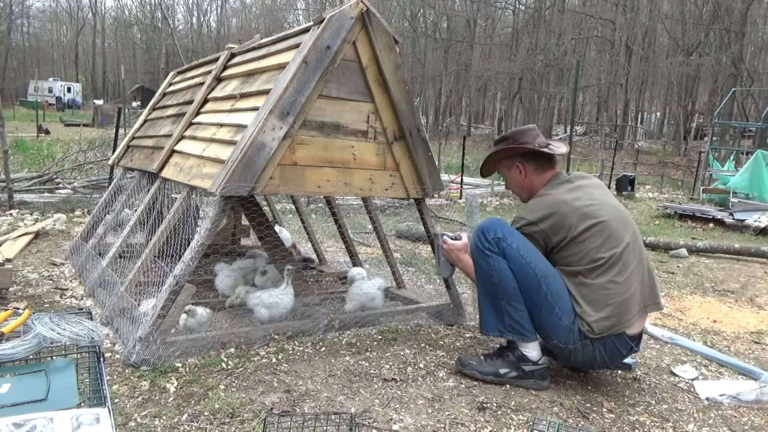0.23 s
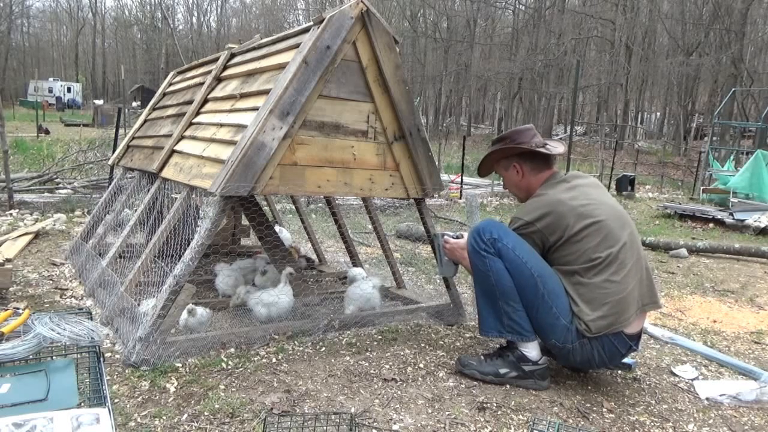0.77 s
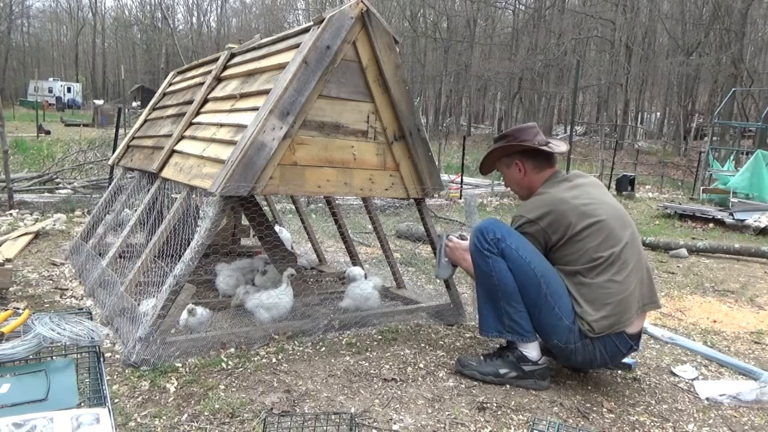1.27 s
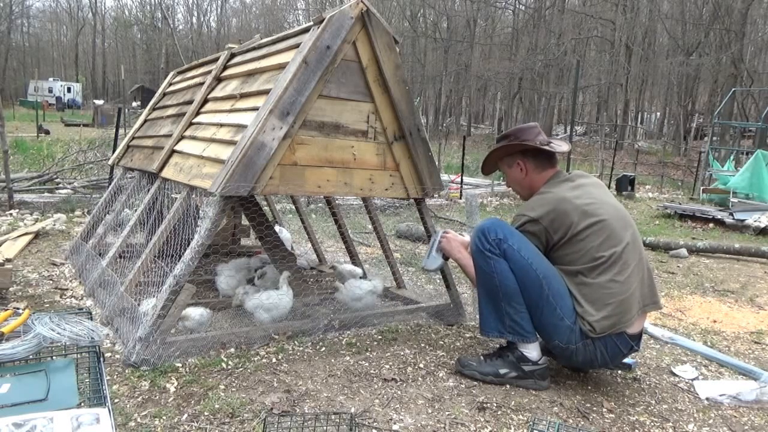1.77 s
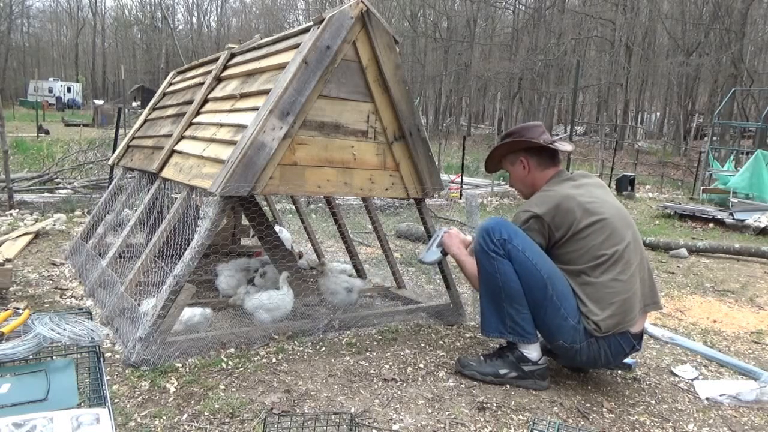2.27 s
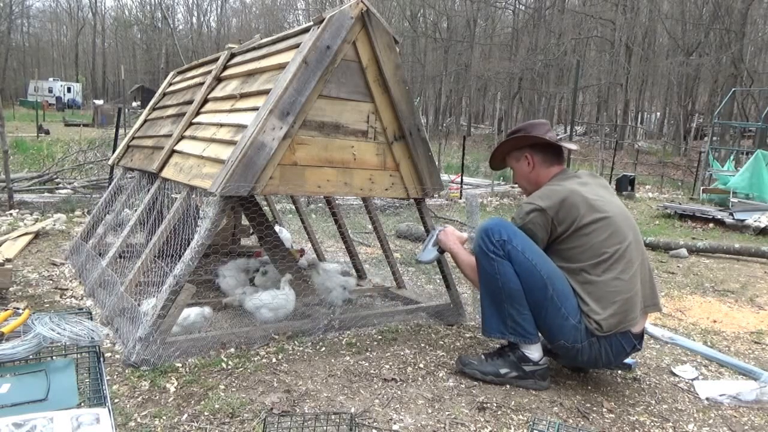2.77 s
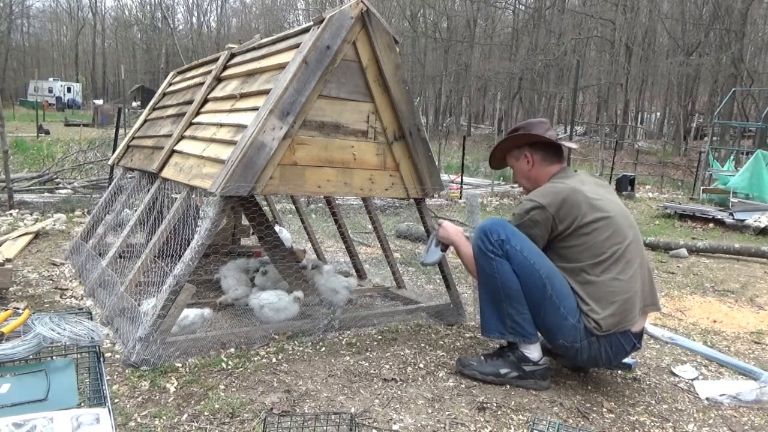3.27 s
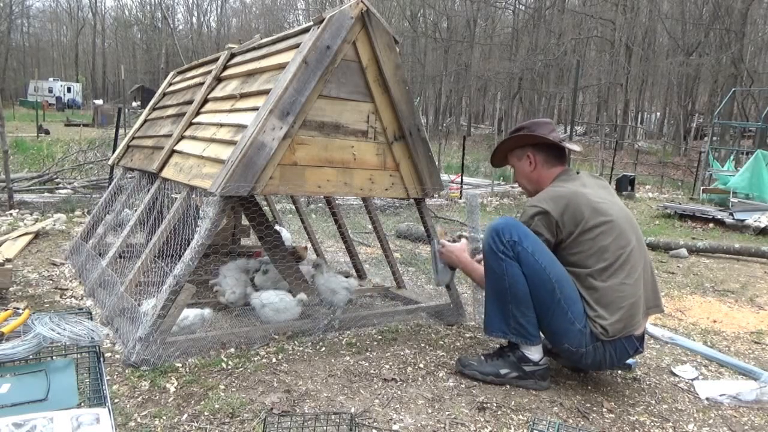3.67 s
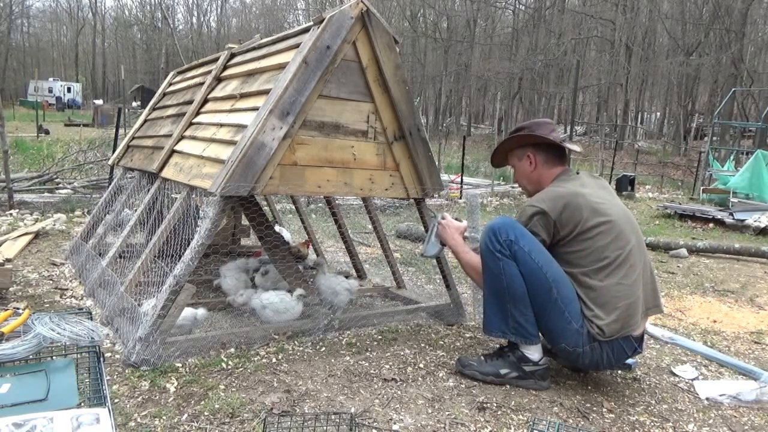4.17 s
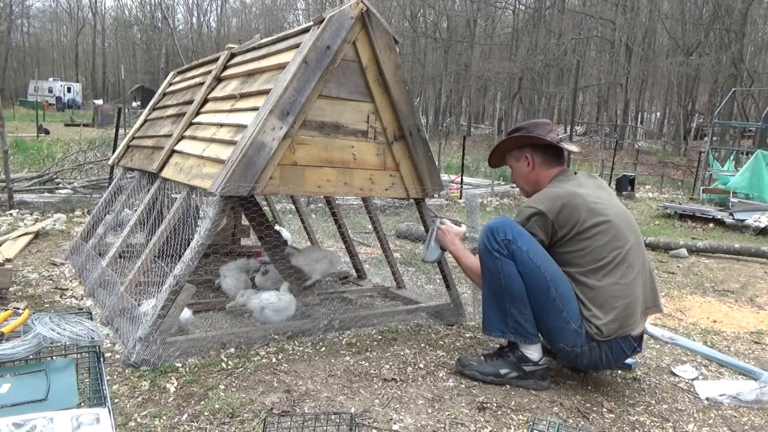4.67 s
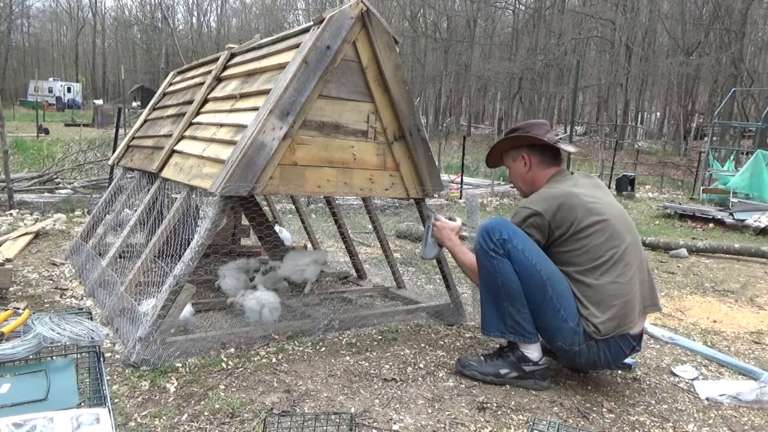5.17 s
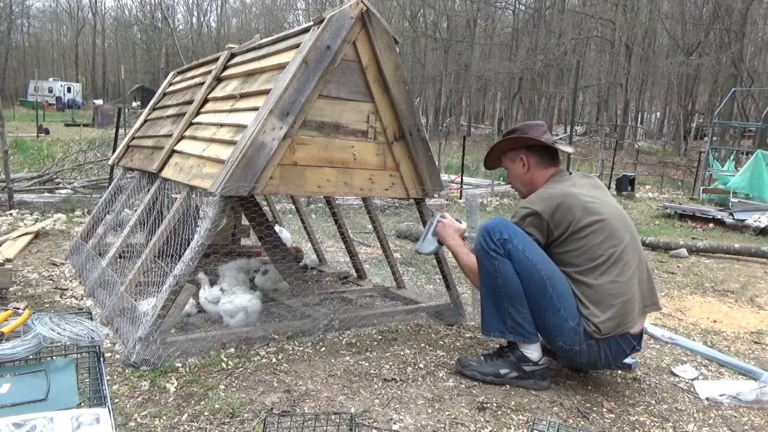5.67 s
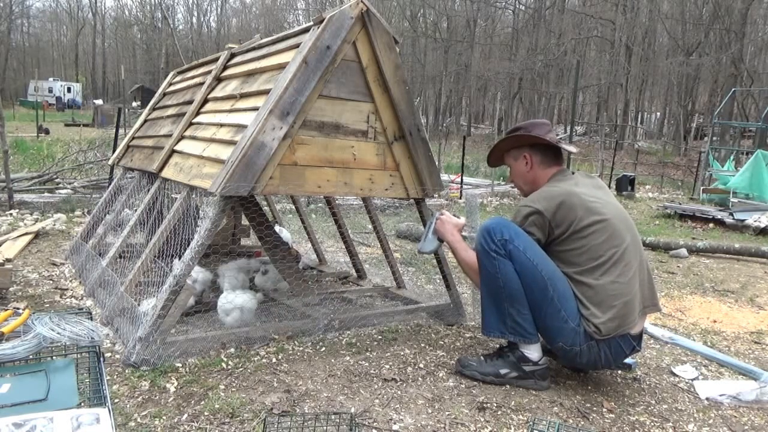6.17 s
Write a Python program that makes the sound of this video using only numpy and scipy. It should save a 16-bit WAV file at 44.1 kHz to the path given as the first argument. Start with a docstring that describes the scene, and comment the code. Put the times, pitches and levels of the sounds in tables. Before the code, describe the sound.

A hand staple gun snaps staples through rattling wire mesh into wood outdoors, while young chickens softly cluck and peep.

```python
"""Light steel clicks and a rattle of wire break an outdoor hush: a hand staple gun, a few metres away,
is fixing mesh to the wooden frame of a chicken coop. Its steel parts crack, chatter and ring, the mesh
shivers, and the frame knocks and booms under the hard shots. Beside it young chickens cluck, cackle
and peep in short whistled notes, and the woods echo faintly."""
import sys
import numpy as np
from scipy import signal
from scipy.fft import rfft, irfft, next_fast_len
from scipy.io import wavfile
from scipy.ndimage import uniform_filter1d, map_coordinates

SR = 44100
rng = np.random.default_rng(int(sys.argv[2]) if len(sys.argv) > 2 else 0)


def dump(signal):
    """Clip the signal to [-1, 1] and save it as 16-bit WAV at the path in sys.argv[1]."""
    limited = np.clip(np.atleast_2d(signal).T, -1, 1)
    pcm = np.round(limited * 32767).astype(np.int16)
    wavfile.write(sys.argv[1], SR, pcm)


N = 283122


def amp(db):
    return 10 ** (np.asarray(db) / 20)


def unit(x):
    return x / np.sqrt(np.mean(x ** 2) + 1e-20)


def along(points, hz):
    """Read a curve of (f/Hz, value) points on a log frequency axis."""
    f, v = np.transpose(points)
    return np.interp(np.log(hz + 1), np.log(f + 1), v)


def add(track, s, sound):
    """Mix a sound into a track at s seconds."""
    room = track[max(round(s * SR), 0):][:len(sound)]
    room += sound[:len(room)]


def wobble(rate, size):
    """A smooth random curve, rate knots a second."""
    return map_coordinates(rng.standard_normal(8192), [np.arange(size) * rate / SR], mode="wrap")


def filtered(x, response):
    """Shape x with a gain that depends on frequency."""
    n = x.shape[-1]
    m = next_fast_len(n + 8192)
    return irfft(rfft(x, m) * response(np.fft.rfftfreq(m, 1 / SR)), m)[..., :n]


def eq(x, curve):
    """Equalise x with a curve of (f/Hz, level/dB) points."""
    return filtered(x, lambda hz: amp(along(curve, hz)))


def noise(spectrum, size):
    """Coloured noise of rms 1."""
    return unit(eq(rng.standard_normal(size), spectrum))


def ring(modes, t, scatter_db, detune):
    """Damped modes with random polarity and scattered level and tuning; starts near rms 1."""
    hz, db, t60 = np.transpose(modes)
    size, shift, sign = rng.standard_normal((3, len(hz)))
    gain = amp(db + scatter_db * size) * np.sign(sign)
    waves = np.sin(2 * np.pi * np.outer(t, hz * (1 + detune * shift))) * amp(-60 * t[:, None] / t60)
    return waves @ gain * np.sqrt(2 / np.sum(gain ** 2))


# colour of the open-air bed: f/Hz, level/dB
AIR_SPECTRUM = [(15, -37), (25, -14), (92, -2.5), (153, -1.5), (256, -2.5), (344, -5), (451, -4.5),
                (840, -4), (1160, -4.5), (2990, -14), (3620, -14), (5430, -17.5), (9070, -18.5),
                (16000, -24)]
# its stereo image: f/Hz, left-right correlation
AIR_CORRELATION = [(60, 0.98), (130, 0.99), (290, 0.73), (640, 0.41), (1410, 0.42), (3100, 0.39),
                   (6820, 0.35), (15000, -0.32)]

def air(level_db=-57, drift_db=0.6):
    """Quiet outdoor hush, centred in the bass and wide above."""
    def mid_side_gains(hz):
        width = np.arccos(np.clip(along(AIR_CORRELATION, hz), -1, 1)) / 2
        return amp(along(AIR_SPECTRUM, hz)) * [np.cos(width), np.sin(width)]
    mid, side = filtered(rng.standard_normal((2, N)), mid_side_gains)
    return np.array([mid + side, mid - side]) / np.std(mid) * amp(level_db + drift_db * wobble(4.27, N))


# reverb time of the woods: f/Hz, t60/s
WOODS_DECAY = [(100, 0.625), (500, 1.32), (2000, 2.25), (4500, 1.3), (9000, 1.5), (15000, 0.39)]

def placed(x, lag_us, pan_db, near_db, woods_db):
    """Direct sound, left lagging by lag_us; coop and ground scatter it, then the trees answer."""
    lead = np.array([[-.5], [.5]]) * lag_us / 1e6
    direct = filtered(x, lambda hz: np.exp(2j * np.pi * hz * lead)) * amp([[pan_db / 2], [-pan_db / 2]])
    hz, frame_s, bands = signal.stft(rng.standard_normal((2, SR)), SR, nperseg=256)
    colour_db = along([(200, -6), (1000, -0.5), (4000, 0.5), (7000, -5), (14000, -14)], hz)
    bands *= amp(colour_db[:, None] - 60 * frame_s / along(WOODS_DECAY, hz)[:, None])
    t = np.arange(SR) / SR
    far = signal.istft(bands, SR, nperseg=256)[1][:, :SR] * (1 - np.exp(-t / 0.052))
    near = rng.standard_normal((2, SR)) * amp(-60 * t / 0.047) * (t > .002)
    near = eq(near, [(150, -17), (1000, -5), (3500, 5)])  # thin slats and wire scatter little bass
    tail = amp(near_db) * near / np.linalg.norm(near[0]) + amp(woods_db) * far / np.linalg.norm(far[0])
    return direct + signal.fftconvolve(x[None], tail, axes=1)[:, :N]


def syrinx(pitch, overtones_db, jitter, flutter_db, waver):
    """A bird's whistle of rms 1 with overtones; its pitch wavers slowly and jitters fast."""
    size = len(pitch)
    unsteady_hz = pitch * (1 + waver * wobble(68.6, size) + jitter * wobble(681, size))
    phase = 2 * np.pi * np.cumsum(unsteady_hz) / SR
    tone = sum(amp(db + rng.normal(0, 0.67)) * np.sin(k * phase) for k, db in enumerate(overtones_db, 1))
    return unit(tone * amp(flutter_db * wobble(233, size)))


# peep cues: t/s, length/s, landing f/Hz, fall/octaves, end lift/octaves, level/dB
PEEP_CUES = [(0.647, 0.086, 2500, 0.47, 0.12, -46), (2.091, .085, 2990, 0.31, -0.25, -51.5),
             (2.438, 0.069, 3180, 0.52, -0.016, -59), (2.801, 0.068, 2035, .24, .05, -43.5),
             (3.018, 0.077, 2610, 0.48, 0.091, -46), (3.785, 0.083, 2900, .55, -0.066, -45),
             (4.39, 0.063, 2690, 0.75, -0.041, -46), (5.117, 0.071, 2650, 0.77, -.1, -42),
             (5.501, .085, 2520, .38, 0.018, -45), (5.896, 0.09, 2396, 0.79, -0.028, -45),
             (6.036, 0.094, 2764, 0.74, -0.24, -45.5), (6.215, 0.037, 2840, 0.57, -.25, -48.5),
             (6.34, 0.057, 3060, 0.59, -0.13, -55)]
# pitch envelope that hooks up, falls, lifts and drops off: share of length, share of fall above landing
PEEP_CONTOUR = [(0, .45), (.14, 1), (.4, 0.15), (.6, -0.041), (.8, 0.13), (1, -0.16)]
# bend after landing: share of length, share of lift
PEEP_END_BEND = [(.6, 0.013), (.82, 0.96)]

def peeps(taper=0.54, throat_hz=2750, throat_width_hz=1000):
    """Thin whistles on one shared falling contour; they swell as they pass the throat's resonance."""
    out = np.zeros(N)
    for s, length, hz, fall, lift, db in PEEP_CUES:
        u = np.linspace(0, 1, round(length * SR))
        contour = uniform_filter1d(np.interp(u, *np.transpose(PEEP_CONTOUR)), size=len(u) // 8)
        pitch = hz * 2 ** (fall * contour + lift * np.interp(u, *np.transpose(PEEP_END_BEND)))
        throat = 1 / (1 + ((pitch - throat_hz) / throat_width_hz) ** 2)
        tone = syrinx(pitch, overtones_db=[0, -18.5, -31], jitter=0.022, flutter_db=2.4, waver=0.01)
        add(out, s, amp(db) * np.abs(np.sin(np.pi * u)) ** taper * unit(throat * tone))
    return out


def cluck(length, hz, harsh, scoop=0.883, harsh_db=10, rasp=0.044):
    """A short note that dips in pitch and recovers; harsh (0-1) adds attack, rasp and brightness."""
    u = np.linspace(0, 1, round(length * SR))
    lowest_at = rng.normal(.57, .04)
    pitch = hz * (1 + scoop * (u - lowest_at) ** 2)
    boost_db = harsh * harsh_db * np.minimum(np.arange(6) / 2, 1)
    overtones_db = np.array([0.5, -10, -26, -34, -38, -38]) + boost_db
    tone = syrinx(pitch, overtones_db, jitter=0.021 + rasp * harsh, flutter_db=1.5, waver=0.0074)
    return np.abs(np.sin(np.pi * u ** (1 - harsh / 2))) * tone


# single clucks: t/s, lowest f/Hz, level/dB
CLUCK_CUES = [(2.018, 908, -45), (2.188, 850, -41), (2.214, 884, -46.5), (2.388, 829, -41.5),
              (2.547, 888, -45), (3.932, 742, -50), (4.55, 910, -48.5), (4.644, 874, -36.5)]
# quick runs of clucks: t/s, notes, beat/s, lowest f/Hz, mid-run rise/octaves, opening level/dB
CACKLE_CUES = [(4.853, 6, .0405, 880, .11, -35), (5.116, 2, 0.042, 985, 0, -40),
               (5.344, 8, .04, 929, .43, -35.5), (5.795, 3, 0.041, 936, 0.43, -42)]

def clucks(scatter_octaves=0.018, note_fill=0.91, hasten=0.016, tiring_db_per_s=31,
           strain_db_per_octave=2.5):
    """Single clucks, and cackles that burst out, quicken and arch in pitch while the voice tires."""
    out = np.zeros(N)
    for s, hz, db in CLUCK_CUES:
        add(out, s, amp(db) * cluck(length=0.0305, hz=hz, harsh=0.51))
    for s, notes, beat, hz, arch, db in CACKLE_CUES:
        for k, u in enumerate(np.linspace(0, 1, round(notes))):
            octaves = arch * np.sin(np.pi * u) + scatter_octaves * rng.standard_normal()
            note = cluck(note_fill * beat, hz * 2 ** octaves, harsh=0.39 if k else 0.72)
            note_db = db - tiring_db_per_s * k * beat - strain_db_per_octave * octaves
            add(out, s + k * beat * (1 - hasten * k), amp(note_db) * note)
    return out


# a staple or the gun's nose hits the post: t/s, level/dB
KNOCK_CUES = [(.424, -46), (3.366, -29), (4.474, -45), (5.2378, -17)]
# woody tone of the post: f/Hz, level/dB, t60/s
POST_MODES = [(205, -13.5, 0.076), (320, -14.5, 0.13), (460, -11, 0.049), (567, -12, 0.049),
              (665, -3, 0.021), (760, -0.5, 0.046), (863, 1, 0.053), (1050, -9, .05), (1430, -3.5, 0.022),
              (1620, -2.5, 0.038)]
# jolts to the coop frame: t/s, level/dB
THUD_CUES = [(.419, -51), (.883, -47), (2.6, -44), (3.376, -34.5), (3.538, -50), (4.476, -49.5),
             (4.918, -48), (5.242, -38), (6.175, -53.5)]
# noisy boom of the boards: f/Hz, level/dB
BOOM_SPECTRUM = [(30, -58), (65, -37), (92, -2), (125, 4.5), (180, -3), (238, 0.5), (290, -6.5), (370, -10),
                 (500, -4.5), (640, -15), (790, -9.5), (1500, -11), (4000, -68)]
# low ring of the boards: f/Hz, level/dB, t60/s
BOARD_MODES = [(92.8, -5, 0.65), (127, -13, 0.59), (171, 0, 0.37), (237.7, 4.5, 0.19)]

def wood(swell_s=0.0054, boom_t60=0.48, boards_db=-3, low_cut_hz=70):
    """The post knocks at once; the boards of the coop take up the jolt more slowly."""
    out, t = np.zeros(N), np.arange(SR // 2) / SR
    for s, db in KNOCK_CUES:
        add(out, s, amp(db) * ring(POST_MODES, t, scatter_db=0, detune=0.017))
    for s, db in THUD_CUES:
        boom = amp(-60 * t / boom_t60) * noise(BOOM_SPECTRUM, len(t))
        boards = amp(boards_db) * ring(BOARD_MODES, t, scatter_db=-2.5, detune=0.013)
        add(out, s, amp(db) * (1 - np.exp(-t / swell_s)) * (boom + boards))
    # narrow boards radiate no deep bass
    return signal.sosfilt(signal.butter(3, low_cut_hz, "high", fs=SR, output="sos"), out)


# pulls and presses on the mesh: peak t/s, swell/s, fade/s, level/dB, treble/dB
SHAKE_CUES = [(.43, 0.034, 0.078, -45, -8), (.615, .02, 0.066, -55, -5), (.888, 0.033, 0.032, -48.5, -7.5),
              (1.436, 0.038, 0.039, -57.5, -22), (1.905, 0.055, 0.086, -46.5, -9.5),
              (2.05, 0.039, 0.092, -49.5, -9.5), (2.62, 0.033, 0.018, -33, -1.5),
              (3.385, 0.026, 0.096, -29, 4.5), (3.484, 0.08, 0.12, -39, -0.5), (4.17, 0.053, 0.083, -55, 2),
              (4.48, .022, 0.097, -40, -10), (4.8, 0.096, 0.13, -50, -8), (5.22, 0.04, 0.041, -35, -3.5),
              (6.01, 0.12, 0.066, -48.5, -8), (6.3, 0.022, 0.093, -50, -7)]
# colour of scraping wire: f/Hz, level/dB
WIRE_SPECTRUM = [(200, -18), (450, -3.5), (900, -2), (1450, 2.5), (2000, -2.5), (3300, -4), (4600, -1.5),
                 (6500, -12.5), (8800, -6), (11300, -3.5), (14500, -15), (16000, -30)]
# ring of the gun's steel body, also used for the wire's ring: f/Hz, level/dB, t60/s
STEEL_MODES = [(1304, 1.5, 0.18), (1433, 1.5, 0.099), (1623, 1, 0.2), (2342, 2, 0.09), (2530, 8, 0.096),
               (3080, -15, 0.12), (3730, 13.5, 0.036), (4740, -7, 0.033), (5360, 14.5, 0.057),
               (8100, 0, 0.11), (8600, -12, 0.068), (10340, -7, .11), (10800, -3, 0.061)]

def mesh(ticks_per_s=550, tick_s=0.0015, spread_db=4, ring_db=-13, rub_db=-10,
         surge_db=2.5, surges_per_s=40):
    """Showers of wire ticks swell, surge and fade over a faint steel ring, randomly detuned per shake."""
    out, t = np.zeros(N), np.arange(-SR // 4, SR // 3) / SR
    for s, swell, fade, db, bright_db in SHAKE_CUES:
        ticks = (rng.random(len(t)) < ticks_per_s / SR) * amp(spread_db * rng.standard_normal(len(t)))
        energy = signal.lfilter([1], [1, -np.exp(-1 / (tick_s * SR))], ticks ** 2)
        grain = unit(np.sqrt(energy)) + amp(rub_db)
        wires = unit(grain * noise(WIRE_SPECTRUM, len(t))) * amp(surge_db * wobble(surges_per_s, len(t)))
        steel = ring(STEEL_MODES, t[(t >= 0) & (t < .1)], scatter_db=3, detune=.03)
        body = signal.fftconvolve(wires, steel)[:len(t)]
        rattle = eq(wires + amp(ring_db) * unit(body), [(3000, 0), (9000, bright_db)])
        envelope = np.exp(np.where(t < 0, -(t / swell) ** 2 / 2, -t / fade))
        add(out, s + t[0], amp(db) * unit(rattle) * envelope)
    return out


# steel hits of gun, staple and wire: t/s, level/dB, treble/dB, struck spot f/Hz, rebounds (rounded)
SNAP_CUES = [(.355, -40, 0, 3330, 0), (0.4233, -30, 1.5, 1420, -0.5), (0.598, -32.5, -19, 1600, 0.5),
             (.6461, -30.5, -5.5, 1446, 0), (0.8901, -34, -7, 1690, 0), (1.868, -30.5, -4, 4870, 0),
             (1.897, -26, 0.5, 5060, 0), (2.0445, -25.5, -8.5, 3130, 0), (2.587, -24.5, 3, 4560, 0),
             (2.612, -27, -14, 1670, 0), (2.6237, -15.5, 2, 4600, 1), (3.303, -28.5, -20, 1440, 0),
             (3.343, -14, 2, 8930, 0), (3.3558, -12, 4.5, 11120, 3.5), (3.479, -18, -1, 4550, 0),
             (3.5336, -17.5, 2.5, 4750, 1.5), (3.628, -28, -4, 3240, 0), (3.6447, -14, -1.5, 3245, 2),
             (4.12, -33.5, -13, 4300, 0), (4.4735, -19, -8, 1455, 0), (4.5346, -36.5, 4, 1650, 0),
             (4.9156, -37, 0, 1790, 1), (5.2125, -21.5, 4, 10600, -1), (5.2345, -14, -8, 1534, 0.5),
             (5.26, -17, -1.5, 2300, 0.5), (5.3112, -28.5, -10, 1480, -0.5),
             (6.0122, -33.5, -5.5, 2570, 0.5), (6.199, -36, -14, 2830, 1)]
# colour of the crack and clatter: f/Hz, level/dB
STEEL_SPECTRUM = [(180, -17.5), (300, -10.5), (366, -16), (787, -19), (1010, -19), (1610, -2), (2030, -7.5),
                  (3290, -2.5), (4090, -3.5), (4590, 2.5), (6520, -13), (8640, -7.5), (11300, -7),
                  (14200, -15.5), (16000, -23)]

def snaps(crack_db=-2, crack_t60=0.01, clatter_db=-8, clatter_t60=0.067, ring_db=-17, rise_s=0.0003,
          spot_db=-5.5, spot_t60=0.031, treble_db=1, rebound_s=0.0057, rebound_loss_db=3):
    """Steel strikes and rebounds: a sharp crack, a short clatter of loose parts and a ringing body."""
    out, t = np.zeros(N), np.arange(SR // 7) / SR
    attack = 1 - np.exp(-t / rise_s)
    fade = amp(crack_db - 60 * t / crack_t60) + amp(clatter_db - 60 * t / clatter_t60)
    for s, db, bright_db, spot_hz, rebounds in SNAP_CUES:
        for k in range(round(rebounds) + 1):
            hit = fade * noise(STEEL_SPECTRUM, len(t))
            hit += amp(ring_db) * ring(STEEL_MODES, t, scatter_db=2.5, detune=0.005)
            hit = eq(hit, [(700, -6.5), (1300, -0.5), (4500, -5.5), (8000, bright_db + treble_db)])
            if k == 0:  # the struck spot pings on first contact
                hit += amp(spot_db - 60 * t / spot_t60) * np.sin(2 * np.pi * (spot_hz * t + rng.random()))
            add(out, s + k * rebound_s, amp(db - k * rebound_loss_db) * hit * attack)
    return out


def scene():
    """The stapling near the centre, the birds in the coop beside it, open air all round."""
    stapling = placed(snaps() + wood() + mesh(), lag_us=24, pan_db=0.2, near_db=-16, woods_db=-24.5)
    birds = placed(clucks() + peeps(), lag_us=0, pan_db=-1, near_db=-8.5, woods_db=-26.5)
    return stapling + birds + air()


def record(dry, top_hz=15900):
    """A brick-wall low-pass trims the very top of the mix."""
    return filtered(dry, lambda hz: hz < top_hz)


dry = scene()
out = record(dry)
dump(out)
```